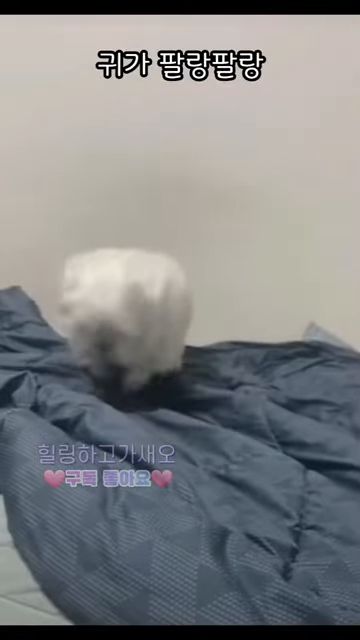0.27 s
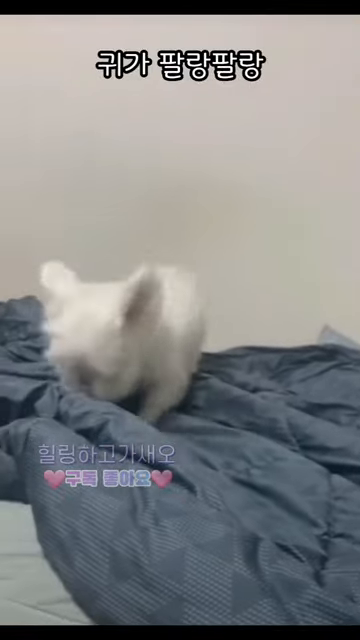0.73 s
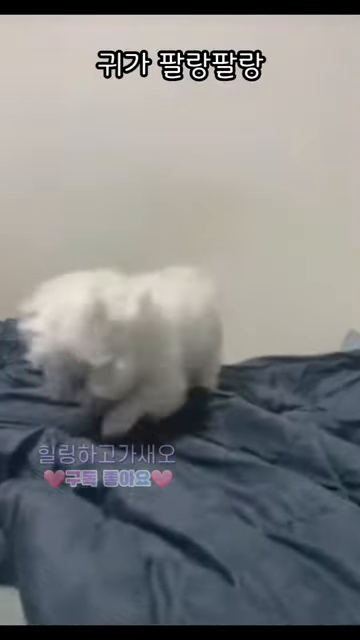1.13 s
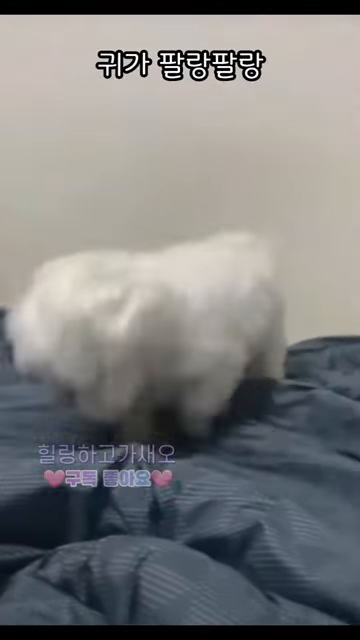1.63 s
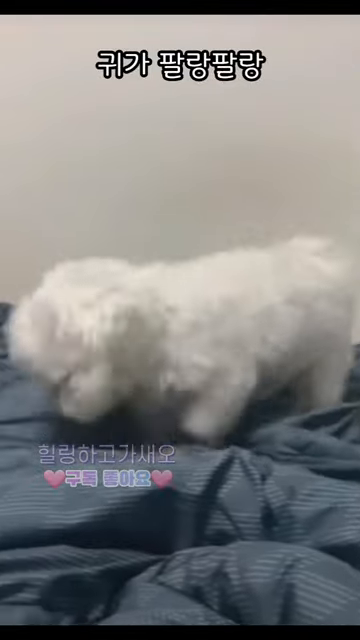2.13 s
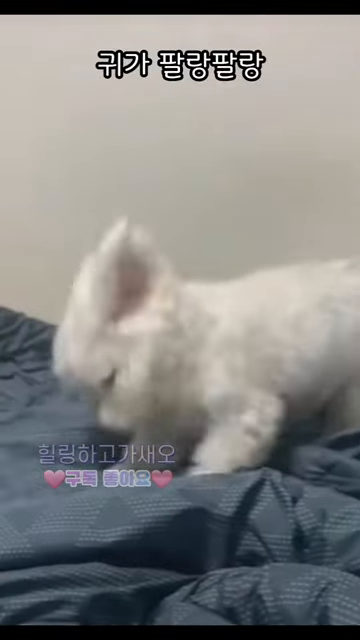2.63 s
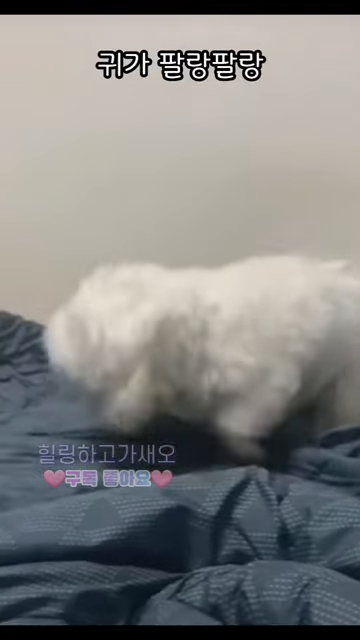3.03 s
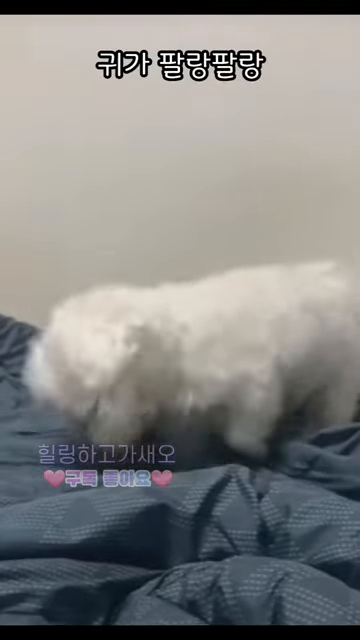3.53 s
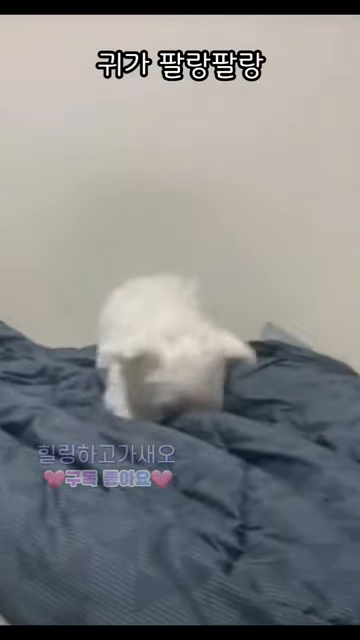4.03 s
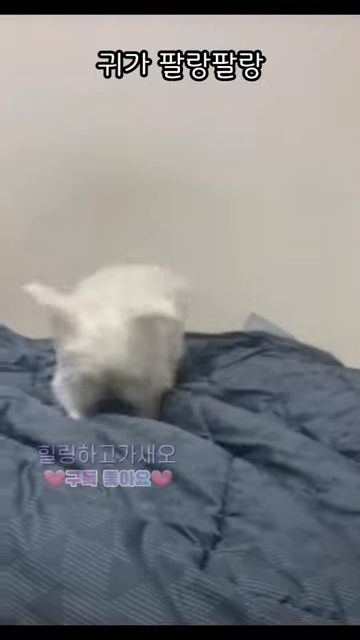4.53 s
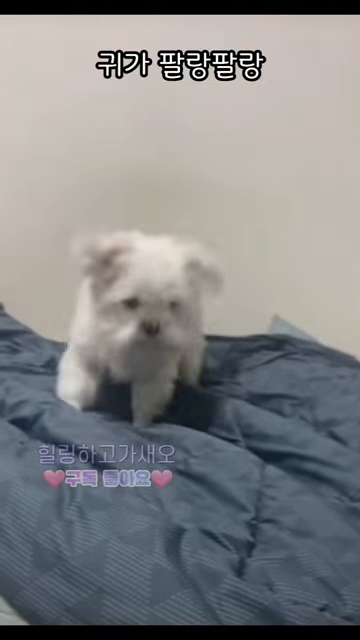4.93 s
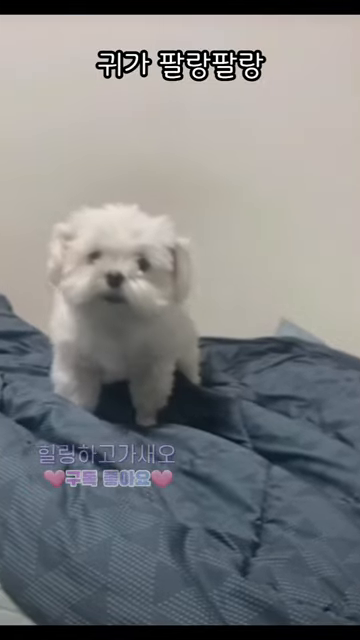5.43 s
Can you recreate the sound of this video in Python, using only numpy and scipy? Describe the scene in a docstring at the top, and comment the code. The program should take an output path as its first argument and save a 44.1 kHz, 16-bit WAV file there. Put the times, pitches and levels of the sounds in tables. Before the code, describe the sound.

Rapid paw strokes on a padded bed cover: bright swishes, grainy rubbing and short claw snags, with the mattress bumping softly underneath. After a tiny gap near four seconds, a few more scrapes follow, with a hollow tinge, then a light rustle and dull thuds. Dry, close, nearly mono, with faint room air behind.

```python
"""A puppy digs at a quilted duvet on a bed, close to the microphone, in a small quiet room.
Each paw stroke brushes the cover, then rubs shell, folds and filling: noise and tiny slips, coloured by each layer.
Claws snag in short clicks as they bite and sometimes haul a fold along. The mattress rocks with every stroke
(low noise) and now and then thumps (swelling sine tones). The sound drops out briefly, then the digging
resumes; it ends in a soft rustle with a few thumps. Soft air noise and a late, hollow drone lie behind."""
import sys
import numpy as np
from scipy import signal
from scipy.fft import rfft, irfft
from scipy.io import wavfile
from scipy.ndimage import uniform_filter1d

SR = 44100
rng = np.random.default_rng(int(sys.argv[2]) if len(sys.argv) > 2 else 0)


def wav_record(signal):
    """Record a signal, one row per channel, as 16-bit PCM in the file named by sys.argv[1]."""
    frames = np.transpose(np.atleast_2d(signal))
    bounded = np.clip(frames, -1, 1)
    # unit amplitude maps onto the largest positive 16-bit level
    quanta = np.round(bounded * 32767).astype(np.int16)
    wavfile.write(sys.argv[1], SR, quanta)


N = 250929  # length in samples

# one row a paw stroke, levels before the final balance of the layers (the last, faint one fades as it lands):
# [touch_s, claws_bite_s, fade_starts_s, swish_db, drag_through_folds_db, crush_of_filling_db, rocking_of_bed_db]
STROKES = [(0.015, 0.099, .12, -34, -35.5, -35, -39), (0.252, 0.337, 0.4, -26, -30.5, -29.5, -35),
           (0.559, 0.61, .68, -24.5, -28.5, -38, -28), (0.848, .886, 0.97, -27, -27, -35.5, -24),
           (1.097, 1.15, 1.238, -28.5, -31.5, -33.5, -30.5), (1.395, 1.427, 1.497, -25.5, -28.5, -34, -28),
           (1.636, 1.666, 1.763, -26.5, -30.5, -37, -28), (1.917, 1.952, 2.024, -27, -32, -36.5, -30),
           (2.158, 2.217, 2.31, -31.5, -34.5, -38.5, -35), (2.449, 2.496, 2.567, -29.5, -32, -32, -34),
           (2.733, 2.803, 2.866, -28.5, -33.5, -36, -35), (2.995, 3.036, 3.13, -30, -37.5, -38, -40),
           (3.296, 3.342, 3.4, -27.5, -33, -33.5, -33), (3.548, 3.612, 3.69, -29.5, -28, -37.5, -34.5),
           (3.849, 3.896, 3.957, -28.5, -34, -35.5, -31.5), (4.12, 4.196, 4.255, -33.5, -37, -40, -35.5),
           (4.413, 4.479, 4.51, -29, -36.5, -34.5, -35.5), (4.672, 4.71, 4.79, -30, -33.5, -33, -33),
           (4.952, 4.977, 5.023, -23, -33, -28.5, -50), (5.182, 5.197, 5.156, -30.5, -45, -58, -42)]
# sound colour of the smooth outer shell: [pitch_hz, level_db per Hz]
SHELL = [(1500, -31), (2300, -1.5), (2900, -2.5), (3800, 0), (4500, -3), (5200, -7), (6100, 0.5),
         (7000, 3.5), (8300, 3), (9000, 0.5), (10000, 1), (11200, -4), (12000, -10), (12400, -36.5)]
# sound colour of the folds beneath: [pitch_hz, level_db per Hz]
FOLDS = [(350, -14), (650, -4), (800, -1.5), (960, 1.5), (1080, 2), (1220, 3), (1500, 2), (1750, 1.5),
         (2000, 1.5), (2350, -8.5), (3200, -33)]
# the sound drops out: [time_s, gain_db]
DROPOUT = [(3.975, 0), (3.979, -22), (3.998, -24), (4.002, -36), (4.11, -30), (4.114, 0)]
CATCH_S = 0.0105  # half length of a catch
FIRST_TICK_S = 0.016  # from the touch of the paw until the claws meet the cloth


def paws(swish, drag, crush):
    """Shell, folds and filling rub in their own colours, but all follow the same stick and slip."""
    # sound colour of the filling: [pitch_hz, level_db per Hz]
    filling_spectrum = [(70, -14), (125, -1.5), (165, 2.5), (200, 0), (280, 1.5), (400, -3.5), (560, -8.5),
                        (800, -16), (1400, -27)]
    # sound colour of a hollow, drone-like rub: [pitch_hz, level_db per Hz]
    hollow_spectrum = [(330, -12.5), (450, 2), (600, 3), (720, -2.5), (860, -3), (1100, -25)]
    # how strong the hollow rub is: [time_s, level_db relative to the crush]
    hollow_level = [(4.1, -24), (4.2, -9.5), (4.77, -3), (5.04, -2.5), (5.2, 5)]
    judder = wander(rate_hz=137)
    shell = friction(SHELL, per_s=2500, spread_db=-3.5, smooth=1.64, judder_db=0.74 * judder, patchy_db=3.5)
    folds = friction(FOLDS, per_s=420, spread_db=2.5, smooth=0.7, judder_db=1.3 * judder, patchy_db=3.2)
    filling = friction(filling_spectrum, per_s=400, spread_db=4.5, smooth=0.85,
                       judder_db=1.1 * judder, patchy_db=4.0)
    hollow = friction(hollow_spectrum, per_s=500, spread_db=4, smooth=1.0,
                      judder_db=1.2 * judder, patchy_db=3.5)
    filling = filling + hollow * gain_of(curve(hollow_level))
    # final balance of the three layers
    return shell * swish * gain_of(-1.27) + folds * drag * gain_of(-1.72) + filling * crush * gain_of(0.6)


def efforts(touch_db=-19, pad_db=-4, sag_db=-2.5, land_db_per_s=700, fade_db_per_s=320, damp_db_per_s=310,
            settle_db=-14, settle_db_per_s=140, rest_db=(-64, -58, -60)):
    """Amplitudes of swish, drag and crush: most paws land, speed up, bite, slow a little and lift;
    the last faint stroke is already fading as it lands."""
    # the claws catch a whole fold and haul it along: [time_s, level_db]
    catches = [(.108, -31.5), (.276, -37.5), (.347, -32), (.62, -29), (.697, -29.5), (1.972, -24),
               (2.022, -25.5), (2.224, -25), (2.238, -28.5), (2.289, -25), (2.52, -24), (2.855, -26),
               (3.039, -28.5), (3.129, -24), (3.403, -27.5), (3.686, -33), (3.961, -25), (4.772, -24),
               (5.052, -30)]
    still_s = 5.33  # the paws come to rest
    bite_db = -4  # every bite catches a little cloth: level relative to the drag
    catch_crush_db, catch_swish_db = 1.5, -8.5  # how a catch weighs on the crush and on the swish
    t = np.arange(N) / SR
    power = gain_of(rest_db)[:, None] ** 2 * (t < still_s)  # the cloth keeps stirring between strokes
    for touch, bite, lift, swish_db, drag_db, crush_db, _ in STROKES:
        near = abs(t - bite) < 0.4
        now = t[near]
        rise_db = touch_db * np.clip((bite - now) / (bite - touch), 0, 1) ** 1.36
        rise_db -= land_db_per_s * np.maximum(touch - now, 0)
        rise_db += pad_db * (now < touch + FIRST_TICK_S)  # only the soft pad rubs until the claws meet the cloth
        coast_s = np.maximum(now - lift, 0)
        fall = gain_of(-fade_db_per_s * coast_s) ** 2
        fall += gain_of(settle_db - settle_db_per_s * coast_s) ** 2  # the shell keeps sliding faintly
        slowing_db = np.interp(now, [bite, lift], [0, sag_db])
        power[0, near] += fall * gain_of(swish_db + rise_db + slowing_db) ** 2
        # folds and filling rise a little more steeply than the shell and do not keep sliding
        grip = gain_of(1.02 * rise_db - damp_db_per_s * coast_s)
        power[1:, near] += (gain_of([[drag_db], [crush_db]]) * grip) ** 2
    # the deeper the paw, the more a catch crushes
    depth_db = 10 * np.log10((power[2] + 1e-12) / (power[1] + 1e-12))
    bites = [(bite, drag_db + bite_db) for _, bite, _, _, drag_db, *_ in STROKES]
    for s, db in bites + catches:
        crush_db = db + depth_db[round(s * SR)] + catch_crush_db
        power += catch(s) * gain_of([[db + catch_swish_db], [db], [crush_db]]) ** 2
    return np.sqrt(power)


def catch(s):
    """Power of a fold hauled along by the claws: it grips abruptly and slips off more gently."""
    u = np.clip((np.arange(N) / SR - s) / CATCH_S, -3, 6)
    return np.exp(-u * u * np.where(u < 0, u * u, 1))


def friction(spectrum, per_s, spread_db, smooth, judder_db, patchy_db):
    """Tiny slips of uneven size over a smooth rub, bunched by the judder of the paw."""
    size = gain_of(spread_db * np.minimum(rng.exponential(1, N), 4))
    slips = size * rng.choice([-1, 1], N) * (rng.random(N) < per_s / SR)
    force = evened(slips) + smooth * rng.standard_normal(N)
    rub = colour(force * gain_of(judder_db), spectrum)
    return evened(crumple(rub, patchy_db))


def crumple(x, depth_db, size=512):
    """The cloth changes shape as it moves, so its resonances drift in patches of pitch and time."""
    overlap = size * 3 // 4
    z = signal.stft(x, nperseg=size, noverlap=overlap)[2]
    patches = uniform_filter1d(rng.standard_normal(z.shape), size=3, axis=0)
    patches = uniform_filter1d(patches, size=14, axis=1)
    return signal.istft(z * gain_of(depth_db * evened(patches)), nperseg=size, noverlap=overlap)[1][:N]


def snags(swish, drag, snap_s=0.00029, pop_s=0.00047, pop_db=-1, size=1024, count=300):
    """The taut shell snaps as a claw lets go; the deeper the claw sits, the more the fold beneath it pops."""
    # single snags of a claw, loud and moderate: [time_s, peak_db before loud peaks are rounded off]
    single_snags = [(0.619, -5), (.888, -19), (1.418, -15), (1.655, -14), (1.667, -8), (1.7199, -11.5),
                    (1.9452, -6), (1.956, -11.5), (2.218, -13.5), (2.467, -16), (3.029, -16), (3.131, -11),
                    (3.39, -7), (3.655, -9.5), (3.959, -14)]
    out, t = np.zeros(N), np.arange(size) / SR
    depth = drag / (swish + 1e-9)
    tears = rng.standard_normal((count, size))
    for (s, db), tear in zip(single_snags + further_snags(swish), tears):
        snap = colour(tear * np.exp(-t / snap_s), SHELL)
        pop = colour(tear * np.exp(-t / pop_s), FOLDS)
        click = evened(snap) + gain_of(pop_db) * depth[round(s * SR)] * evened(pop)
        add(out, s, gain_of(db) * click / abs(click).max())
    return out


def further_snags(swish, count=10):
    """Further snags (time_s, peak_db): a tick as the claws land, then a run at most bites that slows and weakens."""
    per_s, peak_db, spread_db = 135, 11, 0.5  # starting rate, first peak relative to the swish, scatter
    slowing, weakening_db = 1.25, 0.7  # from snag to snag: growth of the gap, loss of level
    first_tick_db = 3.5  # peak relative to the drag
    rows, k = [], np.arange(count)
    for touch, bite, lift, _, drag_db, *_ in STROKES:
        gaps = slowing ** k * (0.5 + rng.random(count)) / per_s
        times = bite - CATCH_S + np.cumsum(gaps) - gaps[0]
        sizes = peak_db - weakening_db * k + spread_db * rng.standard_normal(count)
        rows.append((touch + FIRST_TICK_S, drag_db + first_tick_db))
        for s, db in zip(times, sizes):
            if s < lift:
                rows.append((s, db + 20 * np.log10(swish[round(s * SR)])))
    return rows


def cover():
    """A duller, softer rustle: each paw brushes the cover as it touches; sometimes the cover slides by itself."""
    # sound colour of the cover: [pitch_hz, level_db per Hz]
    cover_spectrum = [(600, -16), (950, -3.5), (1650, -3.5), (2000, -2.5), (2600, 2), (3200, -6),
                      (4100, -5), (5200, -19), (7000, -19), (10500, -19), (12500, -40.5)]
    # the cover slides slowly over itself: [start_s, level_db, time_to_swell_s]
    slides = [(0.794, -42.5, 0.073), (1.923, -30.5, 0.03), (2.931, -42, 0.034), (3.715, -44, 0.043),
              (5.367, -44, .008), (5.412, -46.5, 0.034), (5.517, -31.5, 0.045)]
    brush_db, brush_s = -11.5, 0.022  # level relative to the swish, time to swell
    speed = np.zeros(N)
    brushes = [(touch, swish_db + brush_db, brush_s) for touch, _, _, swish_db, *_ in STROKES]
    for s, db, swell_s in slides + brushes:
        add(speed, s, gain_of(db) * swell(swell_s))
    judder_db = 0.43 * wander(rate_hz=90)
    return speed * friction(cover_spectrum, per_s=3000, spread_db=-2.5, smooth=1.4,
                            judder_db=judder_db, patchy_db=4.5)


def mattress():
    """Low rocking of the bed, with a few soft blows that swell and die in several cycles."""
    # the mattress takes a blow: [start_s, level_db before loud peaks are rounded off, pitch_hz, time_to_swell_s]
    thumps = [(.055, -22, 101, 0.0095), (.225, -23.5, 59.4, 0.022), (.328, -19, 93.5, 0.015),
              (.495, -21.5, 52.4, 0.0097), (0.742, -10, 64.7, .02), (1.183, -20, 63, 0.012),
              (1.254, -16, 61.3, .026), (1.416, -15, 70, 0.008), (4.299, -8.5, 75.4, 0.013),
              (4.313, -12.5, 126, 0.013), (4.404, -23, 69.4, 0.021), (4.691, -14.5, 91, 0.0054),
              (5.425, -12.5, 203, 0.0065), (5.432, -7, 70.6, .013), (5.489, -10, 76.5, 0.01),
              (5.518, -12, 150, 0.0044), (5.521, -10.5, 69.5, 0.014)]
    # sound colour of the rocking: (pitch_hz, level_db per Hz)
    rock_spectrum = [(22, -22), (30, -14.5), (42, 1.0), (62, 3), (90, 4.5), (125, -4.5), (180, -13.5), (280, -32.5)]
    out = evened(colour(rng.standard_normal(N), rock_spectrum)) * rocking()
    for s, db, hz, swell_s in thumps:
        push = swell(swell_s)
        tone = np.sin(2 * np.pi * hz * np.arange(len(push)) / SR)
        add(out, s, gain_of(db) * push * tone)
    return out


def rocking(rise_db=-12, fade_db_per_s=150, onset_db_per_s=500):
    """Amplitude of the bed's motion: most strokes build it up until the paw lifts, then it dies away."""
    # the bed sways under the puppy's shifting weight: [time_s, level_db]
    sway = [(0, -36), (.9, -28), (1.6, -45.5), (2.7, -49), (4.3, -43), (4.9, -62.5), (5.15, -33.5),
            (5.69, -33.5)]
    t = np.arange(N) / SR
    power = gain_of(curve(sway)) ** 2
    for touch, _, lift, *_, rock_db in STROKES:
        shape_db = np.interp(t, [touch, lift], [rise_db, 0])
        shape_db -= onset_db_per_s * np.maximum(touch - t, 0)
        shape_db -= fade_db_per_s * np.maximum(t - lift, 0)
        near = shape_db > -60
        power[near] += gain_of(rock_db + shape_db[near]) ** 2
    return np.sqrt(power)


def room(x, wet_db=-11, wall_s=0.0052):
    """Reflections from the near wall onwards, each band of pitch dying at its own speed."""
    # time for the echoes to fade by 60 dB: [pitch_hz, fade_s]
    fade_times = [(150, 0.19), (1000, 0.21), (4000, 0.22), (12000, 0.25)]
    count = SR // 2
    taps = rng.standard_normal(count) * (rng.random(count) < 3000 / SR)  # about 3000 reflections a second
    taps *= np.arange(count) / SR > wall_s
    hz, t, z = signal.stft(taps, SR, nperseg=256)
    fading = gain_of(-60 * t / read(fade_times, hz)[:, None])
    tail = signal.istft(z * fading, SR, nperseg=256)[1]
    return gain_of(wet_db) * signal.oaconvolve(x, tail / np.linalg.norm(tail))[:N]


def drone(level_db=-50):
    """A faint, hollow drone of the room, made of coloured noise, that comes in as the dropout ends."""
    # sound colour of the drone: [pitch_hz, level_db per Hz]
    drone_spectrum = [(200, -25), (330, 3), (440, -8.5), (480, 10.5), (530, -12.5), (640, -11), (850, -7),
                      (1200, -18)]
    hum = evened(colour(rng.standard_normal(N), drone_spectrum))
    return gain_of(level_db) * hum * (np.arange(N) / SR > DROPOUT[-1][0])


def air(level_db=-48):
    """Steady, mostly low noise of the quiet room: random air motion, coloured."""
    # sound colour of the air: [pitch_hz, level_db per Hz]
    air_spectrum = [(30, -11), (60, -4.5), (120, -5.5), (200, -9.5), (330, -14.5), (480, -12.5), (700, -21),
                    (1500, -22.5), (3000, -30), (8000, -35), (12000, -56)]
    return gain_of(level_db) * evened(colour(rng.standard_normal(N), air_spectrum))


def swell(time_s):
    """A soft push that peaks after the given time and dies away."""
    u = np.arange(SR // 2) / SR / time_s
    return (u * np.exp(1 - u)) ** 2


def wander(rate_hz):
    """Smooth chance of unit rms that mostly moves no faster than the rate."""
    hz = np.fft.rfftfreq(N, 1 / SR)
    return evened(irfft(rfft(rng.standard_normal(N)) / (1 + (hz / rate_hz) ** 4), N))


def colour(x, spectrum, size=4096):
    """Filter with the given spectrum, falling 20 dB an octave beyond its ends; nothing sounds early."""
    hz = abs(np.fft.fftfreq(size, 1 / SR)) + 1
    octaves_outside = abs(np.log2(hz / np.clip(hz, spectrum[0][0], spectrum[-1][0])))
    log_gain = np.log(gain_of(np.maximum(read(spectrum, hz) - 20 * octaves_outside, -100)))
    # the Hilbert transform finds the phase that puts the response as early as possible
    taps = np.fft.ifft(np.exp(np.conj(signal.hilbert(log_gain)))).real
    return signal.oaconvolve(x, taps[:size // 2])[:len(x)]


def gain_of(db):
    """Decibels to amplitude."""
    return 10 ** (np.asarray(db) / 20)


def evened(x):
    """Scales to unit rms (average strength)."""
    return x / np.sqrt(np.mean(x ** 2) + 1e-20)


def read(points, hz):
    """Reads a table of values by pitch, on a log-frequency axis."""
    f, value = np.transpose(points)
    return np.interp(np.log(hz + 1), np.log(f + 1), value)


def curve(rows):
    """The second column of a timed table, joined by straight lines, at every sample."""
    rows = np.array(rows)
    return np.interp(np.arange(N) / SR, rows[:, 0], rows[:, 1])


def add(mix, s, sound):
    """Mixes a sound in at a time in seconds."""
    part = mix[max(round(s * SR), 0):][:len(sound)]
    part += sound[:len(part)]


def scene():
    """Nearly mono: the two sides differ only very faintly."""
    swish, drag, crush = efforts()
    cloth = paws(swish, drag, crush) + snags(swish, drag) + cover()
    mid = cloth + room(cloth, wet_db=-9.5) + mattress() + air() + drone()
    side = room(mid, wet_db=-40.5)
    return np.array([mid + side, mid - side])


def record(dry, ceiling=0.32, edge_hz=13000):
    """Peaks are rounded off, the sound drops out for a moment, and the treble ends steeply."""
    rounded = dry / (1 + (dry / ceiling) ** 8) ** (1 / 8)
    interrupted = rounded * gain_of(curve(DROPOUT))
    treble_cut = signal.firwin(255, edge_hz, window=("kaiser", 9), fs=SR)
    return signal.oaconvolve(interrupted, treble_cut[None], "same")


dry = scene()
out = record(dry)
wav_record(out)
```